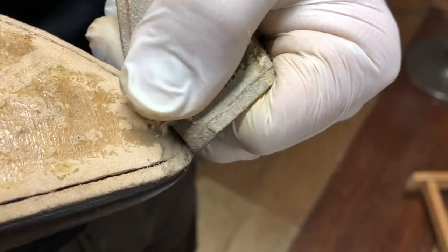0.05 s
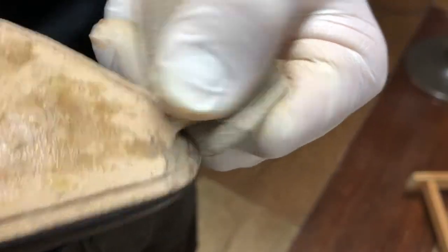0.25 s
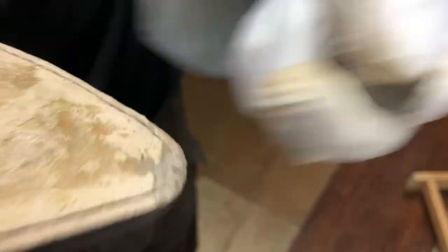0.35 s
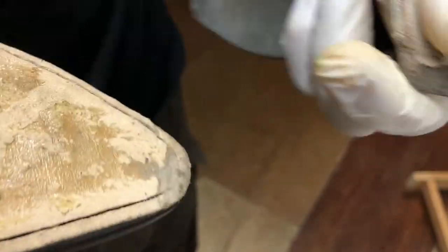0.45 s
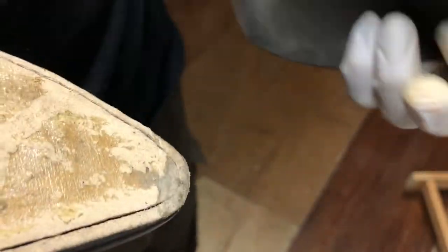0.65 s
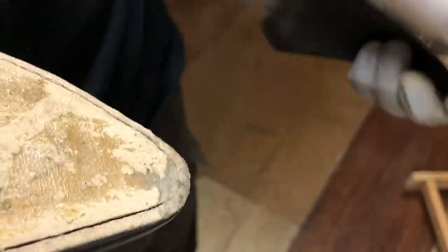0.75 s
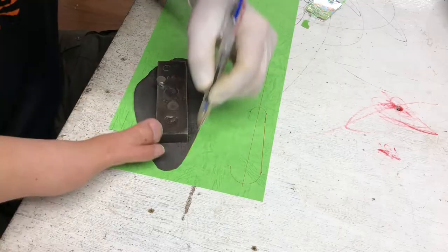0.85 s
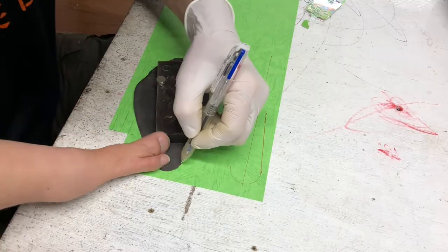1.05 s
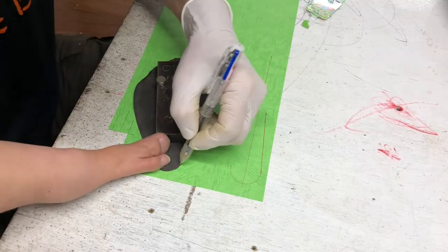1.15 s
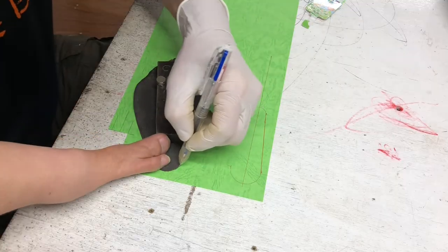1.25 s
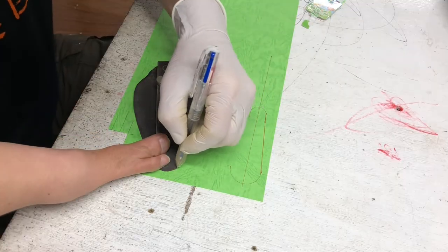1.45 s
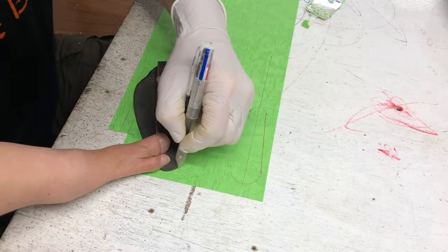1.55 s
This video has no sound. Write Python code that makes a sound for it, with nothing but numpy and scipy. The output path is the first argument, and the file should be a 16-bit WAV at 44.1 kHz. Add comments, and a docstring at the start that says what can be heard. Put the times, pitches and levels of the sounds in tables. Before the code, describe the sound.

Glued rubber peels off a shoe sole close to the microphone, with sticky snaps ending in a short rip. A soft hollow thump and a brief swish follow, then a light tap in a quiet small workshop.

```python
"""A glued rubber layer is peeled off a shoe sole, close to one microphone in a small workshop.
Glue threads snap one by one over a thickening crackle until the last patch rips; the freed rubber
flaps and slides off. A hollow body thumps, something thin rings very faintly and the loose piece
swishes past. Then quiet room tone and ventilation, with a light tap and a faint scratch at the bench.
The peel is nearly dry; the thump and the bench reach the microphone with more of the room."""
import sys
import numpy as np
from scipy import signal
from scipy.fft import rfft, irfft, next_fast_len
from scipy.io import wavfile
from scipy.ndimage import uniform_filter1d

SR = 44100
rng = np.random.default_rng(int(sys.argv[2]) if len(sys.argv) > 2 else 0)


def int16_out(signal):
    """Quantize to a 16-bit WAV file."""
    q = np.round(np.clip(np.atleast_2d(signal).T, -1, 1) * 32767)
    wavfile.write(sys.argv[1], SR, q.astype(np.int16))


N = 70560

# how long the workshop reverberates: (frequency [Hz], t60 [s])
ROOM_T60 = [(150, 0.68), (3000, 0.29), (16000, .25)]
# tone of the reverberation: (frequency [Hz], gain [dB])
ROOM_COLOUR = [(100, 2), (1500, 3.5), (16000, -7.5)]
# dull room tone: (frequency [Hz], gain [dB])
AIR_COLOUR = [(25, -21.5), (82, -4), (125, -5), (260, 2), (370, -9), (520, -9), (1000, -15), (2000, -25),
              (4000, -33), (16000, -40.5)]
# its slow drift: (time [s], level [dB])
AIR_LEVEL = [(0, -69), (.85, -65), (1.6, -66)]
# ventilation resonances: (frequency [Hz], width [Hz], level [dB])
VENT_DRONES = [(176, 7.8, -72), (261, 24, -74.5), (503, 20, -83.5)]
# soft rustle of movement, which stops abruptly near 0.88 s: (time [s], level [dB])
RUSTLE_LEVEL = [(.36, -74.5), (.6, -72.5), (.7, -66), (.875, -65), (.9, -92)]
# tone of the rustle: (frequency [Hz], gain [dB])
RUSTLE_COLOUR = [(60, -10), (200, 4), (1200, -2.5), (6000, -5.5), (16000, -16.5)]

# a light tap over at the bench: (time [s], level [dB])
TAPS = [(1.0675, -47.5), (1.0735, -63.5)]
# tone of the tap: (frequency [Hz], gain [dB])
TAP_COLOUR = [(1000, -15), (2000, -8.5), (3600, -1), (4400, -5.5), (5500, -19), (12000, -36)]
# a soft, heavy double contact: (time [s], level [dB], contact time [s])
THUMP_PUSHES = [(.4400, -43.5, 0.0016), (0.4496, -36.5, 0.0017)]
# the hollow body that it sets ringing: (frequency [Hz], gain [dB], t60 [s])
THUMP_MODES = [(181, 8.5, 0.098), (255.4, -5, 0.27), (301, -14.5, 0.18), (357.5, -5, 0.23), (422, -6, 0.11),
               (498, -21, 0.37)]
# brief dull clatter within the thump: (frequency [Hz], gain [dB])
KNOCK_COLOUR = [(180, -16), (450, 7), (750, -10.5), (1500, -47)]

# rubber and glove rub past each other: (time [s], swell [s], hold [s], release [s], level [dB])
RUBS = [(0.349, .009, 0.012, 0.0044, -43)]
# tone of friction on the rubber: (frequency [Hz], gain [dB])
RUB_COLOUR = [(100, -12.5), (650, -1.5), (1600, -14.5), (3000, -6), (6000, -2.5), (9000, 1.5),
              (12500, -7.5), (16000, -9.5)]
# the loose piece brushes past, growing louder: (time [s], level [dB])
SWISH_LEVEL = [(.66, -81), (.718, -65), (.728, -54.5), (.748, -53), (.76, -45), (.772, -40.5), (.776, -53)]
# tone of the swish: (frequency [Hz], gain [dB])
SWISH_COLOUR = [(150, -30), (1300, -17.5), (2400, -2), (4500, -7), (9500, -1), (15500, 1.5)]
# bending waves in the freed rubber: (time [s], level [dB], decay [s], pitch halving time [s])
FLAPS = [(0.3229, -38.5, .005, 0.0019), (0.3355, -25.5, 0.015, 0.0014)]
# tone of the last patch ripping away: (frequency [Hz], gain [dB])
RIP_COLOUR = [(150, -20.5), (450, -13), (750, 3), (1500, -7.5), (2400, 0.5), (3600, -6.5), (5400, -2.5),
              (8000, -5), (16000, -5)]
# fine crackle along the peeling edge, close up: (time [s], level [dB])
CRACKLE_LEVEL = [(0, -70.5), (.088, -66.5), (.098, -57.5), (.112, -65), (.158, -72.5), (.172, -64.5),
                 (.228, -64), (.243, -53.5), (.27, -55.5), (.302, -54), (.322, -48), (.333, -37.5),
                 (.342, -45.5), (.353, -62)]
# tone of the crackle: (frequency [Hz], gain [dB])
CRACKLE_COLOUR = [(100, -9), (600, -6), (1300, -14), (2000, -3.5), (3600, -9), (6000, -2.5), (8600, -1.5),
                  (11500, -4), (14000, 1), (16000, -5)]
# sticky ticks, as single glue threads snap and tacky surfaces part: (time [s], level [dB])
THREAD_SNAPS = [(.0228, -28), (.0753, -17), (.0923, -36), (.0999, -25), (.1048, -22.5), (.1237, -31.5),
                (.1678, -37), (.1791, -32), (.1805, -30.5), (.1971, -24), (.2018, -27.5), (.2165, -29),
                (.2345, -25), (.2363, -20.5), (.2376, -24.5), (.2545, -31), (.2586, -29.5), (.2623, -26.5),
                (.2857, -23), (.2892, -31.5), (.3076, -28.5), (.3108, -30), (.3137, -23), (.6888, -40),
                (.6912, -37), (.7278, -30), (.7415, -29.5)]
# their bright tone: (frequency [Hz], gain [dB])
THREAD_COLOUR = [(200, -24.5), (1200, -30.5), (2600, -16.5), (4000, -13), (6200, -8), (8500, 3),
                 (11500, -2), (16000, -1.5)]
# thick strands of glue break: (time [s], level [dB])
STRAND_SNAPS = [(.3200, -21.5), (.3232, -18.5), (.3409, -10.5), (.3471, -16)]
# their lower crack: (frequency [Hz], gain [dB])
STRAND_COLOUR = [(200, -19.5), (1300, -13), (2600, -4), (3700, -7.5), (6200, 2.5), (8500, -7), (10000, -16),
                 (13500, -12.5), (16000, -23.5)]


def from_db(db):
    """Decibels to gain."""
    return 10 ** (np.asarray(db) / 20)


def rms_one(x):
    """Scale to an rms of one."""
    return x / np.sqrt(np.mean(x ** 2) + 1e-20)


def seconds():
    """Time of every sample."""
    return np.arange(N) / SR


def level(rows):
    """Gain that follows a table of (time [s], level [dB]), silent outside it."""
    return from_db(np.interp(seconds(), *np.transpose(rows), left=-200, right=-200))


def at_hz(points, hz):
    """Read a table on a log-frequency axis."""
    f, value = np.transpose(points)
    return np.interp(np.log(np.maximum(hz, 1)), np.log(f), value)


def coloured(x, spectrum):
    """Causal (minimum-phase) filter with the given spectrum; keeps the power of white noise."""
    size = next_fast_len(2 * N)
    gain = rms_one(from_db(at_hz(spectrum, np.arange(size // 2 + 1) * SR / size)))
    cepstrum = irfft(np.log(gain), size)
    cepstrum[1:size // 2] *= 2
    cepstrum[size // 2 + 1:] = 0
    return irfft(rfft(x, size) * np.exp(rfft(cepstrum)), size)[:N]


def grains(per_s, spread_db):
    """Random clicks of uneven size and sign; rms near one."""
    chance = np.clip(per_s / SR, 1e-4, 1)
    sizes = rms_one(from_db(spread_db * np.minimum(rng.exponential(1, N), 3)))
    return sizes * rng.choice([-1, 1], N) * (rng.random(N) < chance) / np.sqrt(chance)


def envelope(start_s, attack_s, hold_s, release_s):
    """Straight rise, hold, exponential fall."""
    t = seconds() - start_s
    return np.clip(t / attack_s, 0, 1) * np.exp(-np.maximum(t - attack_s - hold_s, 0) / release_s)


def burst(decay_s):
    """Noise that dies away, with unit energy."""
    tail = rng.standard_normal(N) * np.exp(-seconds() / decay_s)
    return tail / np.sqrt(np.sum(tail ** 2))


def convolved(x, response):
    """Play a signal through an impulse response."""
    return signal.fftconvolve(x, response)[:N]


def low_cut(x, hz, order):
    """Roll off the bass."""
    return signal.sosfilt(signal.butter(order, hz, "high", fs=SR, output="sos"), x)


def snaps(rows, colour, scatter_db, scatter_s):
    """A sharp click for each (time [s], level [dB]), trailed by a brief scatter off nearby surfaces."""
    hits = np.zeros(N)
    for s, db in rows:
        hits[int(s * SR)] += from_db(db)
    scatter = from_db(scatter_db) * convolved(hits, burst(scatter_s))
    return coloured(hits + scatter, colour)


def workshop(x, delay_s=0.0044):
    """The small room answers with diffuse reverberation whose treble dies first."""
    t, tail = seconds(), 0
    edges_hz = np.geomspace(60, 18000, 9)
    for low, high in zip(edges_hz, edges_hz[1:]):
        bandpass = signal.butter(2, [low, high], "band", fs=SR, output="sos")
        band = signal.sosfilt(bandpass, rng.standard_normal(N))
        t60 = at_hz(ROOM_T60, np.sqrt(low * high))
        tail = tail + band * np.exp(-np.log(1000) * t / t60)
    response = coloured(rms_one(tail * (t > delay_s)), ROOM_COLOUR) / np.sqrt(N)
    return convolved(x, response)


def room_tone():
    """Dull air all round the microphone, with narrow bands of noise droning from the ventilation."""
    out = level(AIR_LEVEL) * coloured(rng.standard_normal(N), AIR_COLOUR)
    for hz, width_hz, db in VENT_DRONES:
        radius = np.exp(-np.pi * width_hz / SR)
        feedback = [1, -2 * radius * np.cos(2 * np.pi * hz / SR), radius * radius]
        drone = signal.lfilter([1, 0, -1], feedback, rng.standard_normal(2 * N))[N:]  # once settled
        out = out + from_db(db) * rms_one(drone)
    return out


def rustle():
    """Soft noise of movement behind the peel."""
    return level(RUSTLE_LEVEL) * coloured(rng.standard_normal(N), RUSTLE_COLOUR)


def faint_ring(hz=1083, db=-75):
    """Somewhere in the room something thin rings: one tone that swells and fades."""
    swell = envelope(start_s=0.41, attack_s=0.17, hold_s=0.12, release_s=0.031)
    return from_db(db) * swell * np.sin(2 * np.pi * hz * seconds())


def bench(scratch_db=-71):
    """Over at the bench, a light tap, then a faint scratch as a pen touches the rubber."""
    tap = snaps(TAPS, TAP_COLOUR, scatter_db=11, scatter_s=0.0015)
    stroke = from_db(scratch_db) * envelope(start_s=1.365, attack_s=0.024, hold_s=0.018, release_s=0.039)
    return tap + coloured(stroke * rng.standard_normal(N), RUB_COLOUR)


def thump(knock_gain_db=15.5):
    """Soft pushes knock on a hollow body and set it booming; it radiates little deep bass."""
    t, body, force = seconds(), 0, 0
    for hz, db, t60 in THUMP_MODES:
        body = body + from_db(db) * np.sin(2 * np.pi * hz * t) * np.exp(-np.log(1000) * t / t60)
    for s, db, contact_s in THUMP_PUSHES:
        push = np.sin(np.pi * np.clip((t - s) / contact_s, 0, 1)) ** 2
        force = force + from_db(db) * push / push.sum()
    knock = from_db(knock_gain_db) * coloured(burst(decay_s=0.029), KNOCK_COLOUR)
    return low_cut(convolved(force, body + knock), hz=163, order=4)


def rubbing():
    """Dense tiny slips as the rubber slides off and is swung aside, close to the microphone."""
    stroke = sum(from_db(db) * envelope(s, swell, hold, release) for s, swell, hold, release, db in RUBS)
    slide = coloured(stroke * grains(per_s=12000, spread_db=4), RUB_COLOUR)
    swish = coloured(level(SWISH_LEVEL) * grains(per_s=17000, spread_db=4), SWISH_COLOUR)
    return slide + swish


def flapping(start_hz=1564, attack_s=0.00091, roughness=0.31):
    """Bending waves cross the freed rubber, high notes first: uneven chirps that weaken as they spread."""
    out = 0
    flutter = 1 + roughness * rms_one(uniform_filter1d(rng.standard_normal(N), size=40))
    for s, db, decay_s, halving_s in FLAPS:
        t = np.maximum(seconds() - s, 0)
        spread = 1 + t / halving_s  # the pitch is start_hz / spread
        chirp = np.sin(2 * np.pi * start_hz * halving_s * np.log(spread)) / np.sqrt(spread)
        out = out + from_db(db) * chirp * (1 - np.exp(-t / attack_s)) * np.exp(-t / decay_s)
    return out * flutter


def ripping(start_s=0.3338, db=-27, squeak_hz=4510, rise_hz_per_s=600000, squeak_gain_db=-5.5):
    """The last patch tears away, with a rough stick-slip squeak that rises as the edge speeds up."""
    letting_go = envelope(start_s, attack_s=0.0018, hold_s=0.0018, release_s=0.0011)
    tear = coloured(letting_go * grains(per_s=30000, spread_db=1.5), RIP_COLOUR)
    glide_hz = squeak_hz + rise_hz_per_s * np.maximum(seconds() - start_s, 0)
    jitter = 1 + 0.2 * rng.standard_normal(N)
    squeak = letting_go * rms_one(np.sin(2 * np.pi * np.cumsum(glide_hz * jitter) / SR))
    return from_db(db) * (tear + from_db(squeak_gain_db) * squeak)


def peeling(grains_per_s=2400, reference_db=-54.5):
    """Right at the microphone, glue threads and strands snap over a crackle that thickens with the pull."""
    pull = level(CRACKLE_LEVEL)
    rate = grains_per_s * (pull / from_db(reference_db)) ** 0.91
    ticks = grains(rate, spread_db=4)
    hiss = from_db(-7.5) * rng.standard_normal(N)
    crackle = coloured(pull * (ticks + hiss), CRACKLE_COLOUR)
    threads = snaps(THREAD_SNAPS, THREAD_COLOUR, scatter_db=-8, scatter_s=0.00056)
    strands = snaps(STRAND_SNAPS, STRAND_COLOUR, scatter_db=-13.5, scatter_s=0.0009)
    return crackle + threads + strands


def scene():
    """From the microphone's place the peel is nearly dry; the thump and the bench carry more room."""
    rubber = peeling() + ripping() + flapping() + rubbing()
    boom, bench_work = thump(), bench()
    reverb = workshop(from_db(-24) * rubber + from_db(-19) * boom + from_db(-13.5) * bench_work)
    background = room_tone() + rustle() + faint_ring()
    return (rubber + boom + bench_work + reverb + background)[None]


def record(dry):
    """The mono microphone loses the deepest bass; the top is cut steeply at 16 kHz."""
    thinned = low_cut(dry, hz=36, order=1)
    top_cut = signal.firwin(255, 16000, fs=SR, window="blackman")
    return signal.fftconvolve(thinned, top_cut[None], mode="same")


dry = scene()
out = record(dry)
int16_out(out)
```